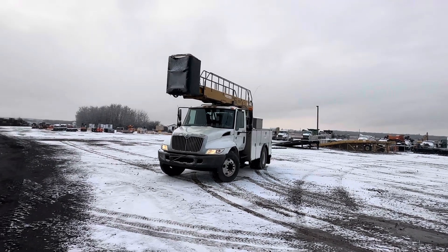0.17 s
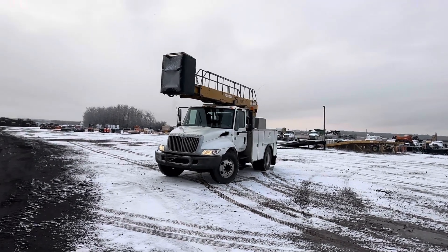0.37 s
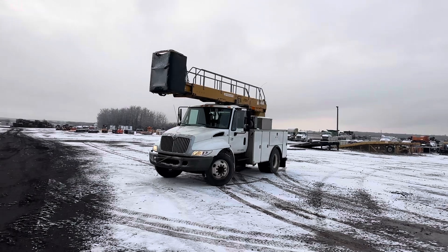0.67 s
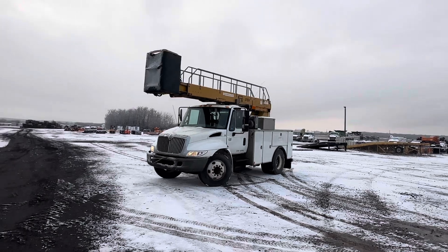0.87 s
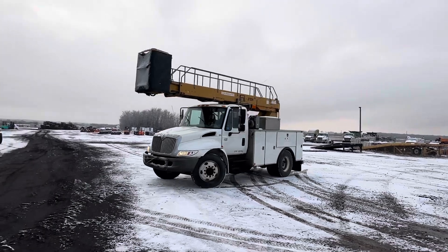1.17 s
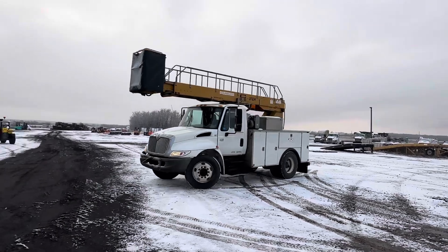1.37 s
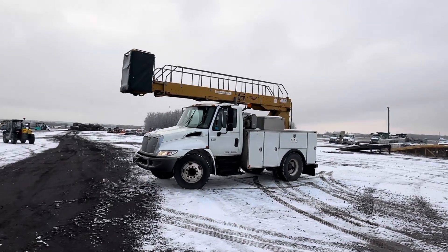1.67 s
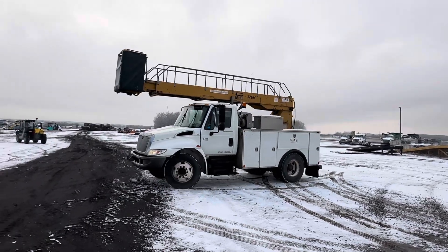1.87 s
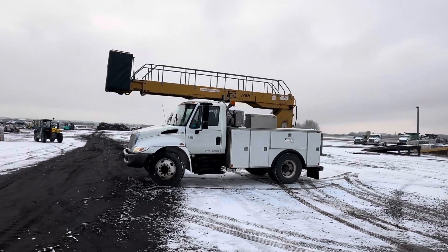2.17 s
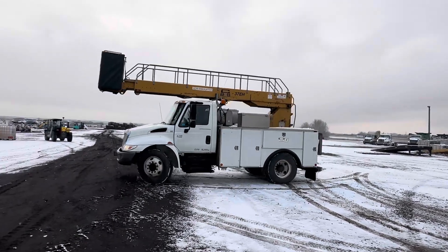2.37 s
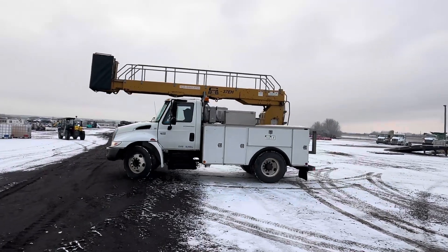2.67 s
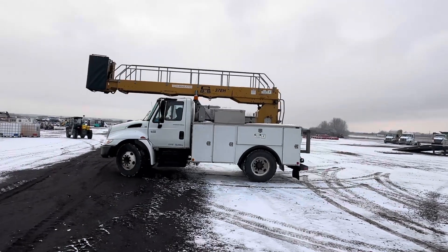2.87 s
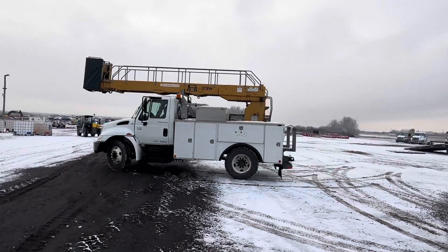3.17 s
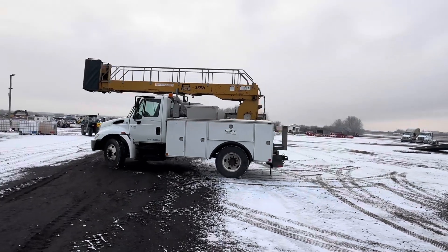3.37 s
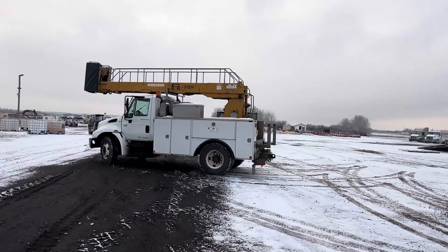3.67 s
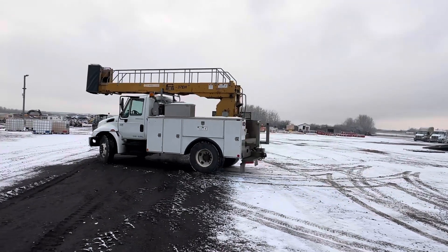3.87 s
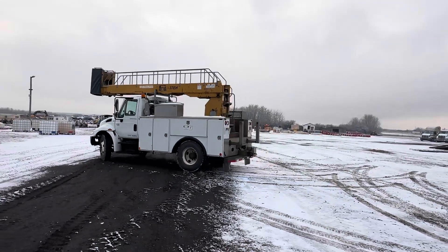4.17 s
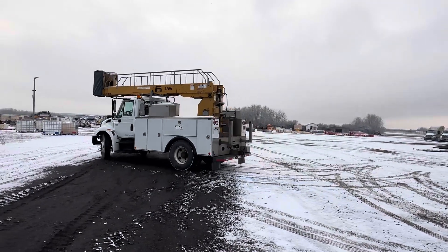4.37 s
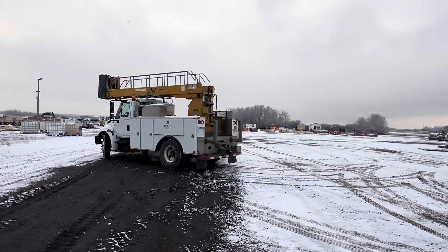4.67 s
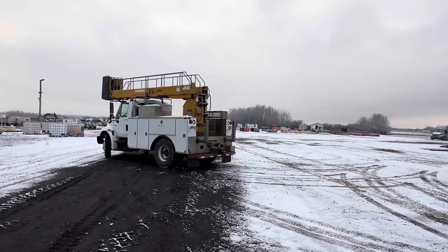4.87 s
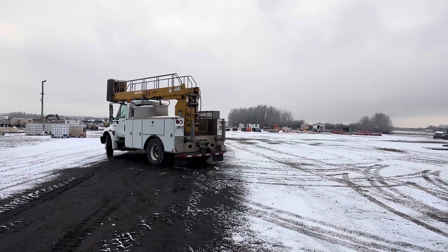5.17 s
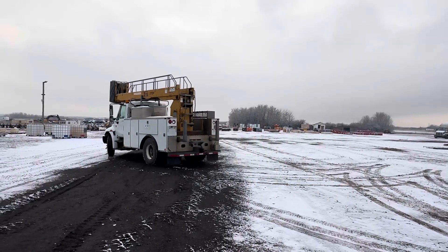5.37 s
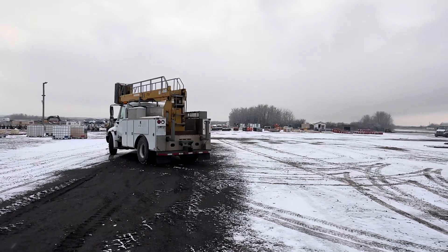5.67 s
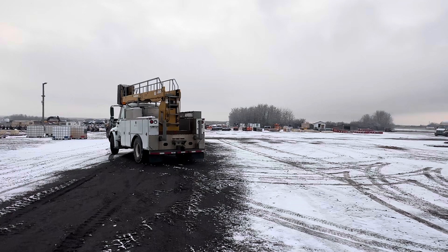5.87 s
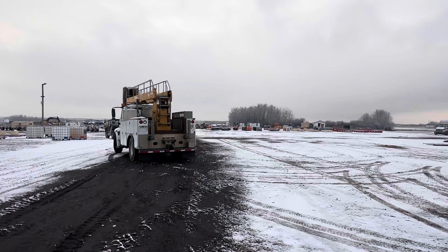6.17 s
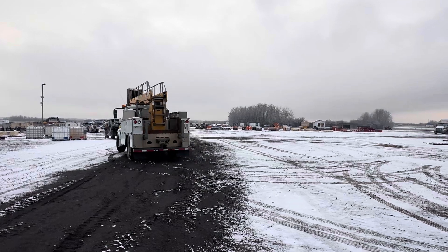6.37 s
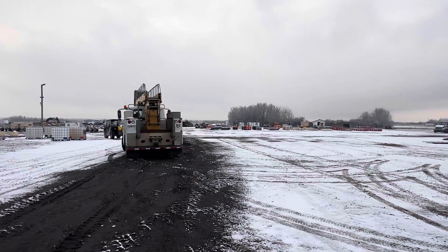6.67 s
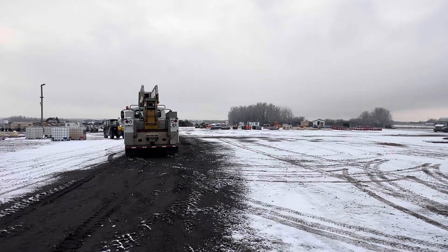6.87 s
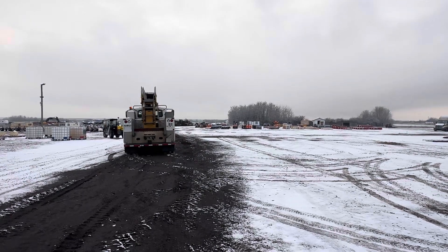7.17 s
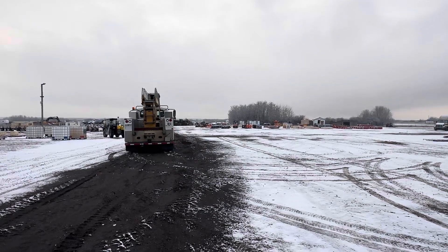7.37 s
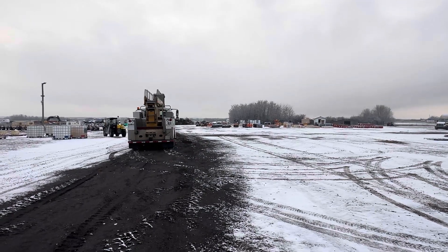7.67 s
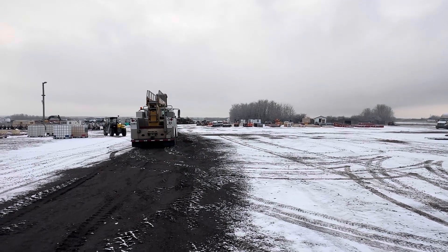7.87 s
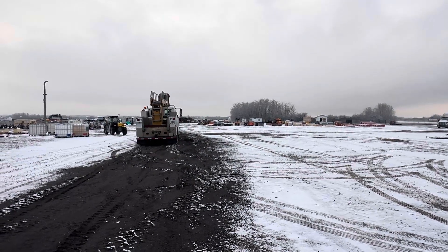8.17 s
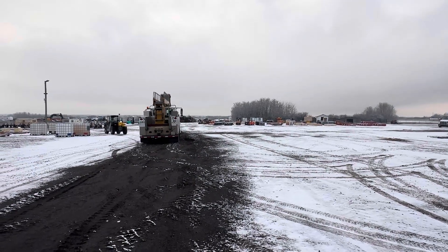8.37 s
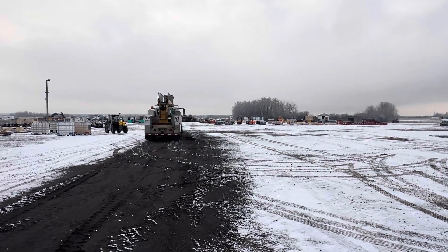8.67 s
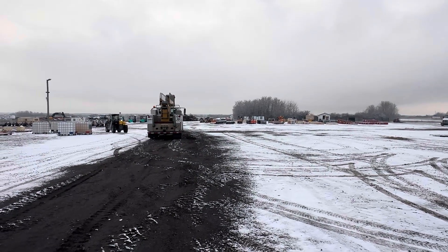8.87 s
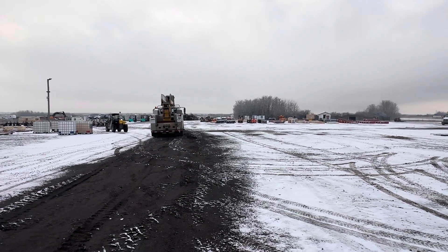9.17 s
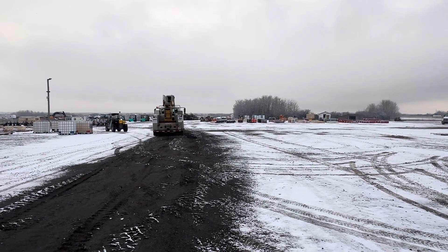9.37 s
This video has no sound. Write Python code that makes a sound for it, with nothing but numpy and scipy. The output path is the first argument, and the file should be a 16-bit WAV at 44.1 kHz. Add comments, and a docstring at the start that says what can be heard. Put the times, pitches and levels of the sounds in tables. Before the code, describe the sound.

In an open snowy gravel yard, a diesel bucket truck swings past a fixed stereo microphone pair. Its engine booms, knocks and clatters as it revs up, the drive belt chirping and the turbo whistling faintly. Revs drop, the body thumps over ruts, and a sudden slap and air hiss fades out. The engine drops again and lugs away, quieter, with loose fittings clanking.

```python
"""A diesel engine pulls and its belt chirps as a bucket truck swings past on a snowy gravel yard.
The six cylinders boom, knock and clatter; the turbo whistles, and the engine drops back twice and lugs away.
Tyres swish and flick stones, the body booms over ruts and fittings clank, made of noise bursts and ringing modes.
The air system blows off once: a slap and thud, then coloured noise that fades through a ringing outlet."""
import sys
import numpy as np
from scipy import signal
from scipy.fft import rfft, irfft, next_fast_len
from scipy.io import wavfile

SR = 44100
rng = np.random.default_rng(int(sys.argv[2]) if len(sys.argv) > 2 else 0)


def store_pcm(level_fs):
    """Save levels as 16-bit WAV."""
    pcm = np.round(np.clip(level_fs, -1, 1) * 32767).astype(np.int16)
    wavfile.write(sys.argv[1], SR, np.atleast_2d(pcm).T)


N = 419816
T = np.arange(N) / SR
HZ = np.maximum(np.fft.rfftfreq(next_fast_len(N + 4000, True), 1 / SR), 1)

NEAR_M = 10  # distance at which the engine levels are stated
# the truck swings past and leaves: (time [s], distance [m])
DISTANCE = [(0, 12.4), (2.6, 9.64), (4, 11.3), (6, 17.3), (9.5, 24.44)]
# a fixed dip thins the low middle of the jolts, slap and thud: (frequency [Hz], level [dB])
LOW_MID_DIP = [(450, -1.5), (600, -5.5), (760, -0.5)]


def from_db(db):
    """Decibels to gain."""
    return 10 ** (np.asarray(db) / 20)


def rms_one(x):
    """Scale to unit power."""
    return x / np.sqrt(np.mean(x ** 2) + 1e-20)


def in_time(rows):
    """Each column of a curve at every sample."""
    s, *columns = np.transpose(rows)
    return [np.interp(T, s, c) for c in columns]


def colour(x, points):
    """Filter by a table of (frequency [Hz], level [dB])."""
    hz, db = np.transpose(points)
    size = 2 * (len(HZ) - 1)
    gain = from_db(np.interp(np.log(HZ), np.log(hz), db))
    return irfft(rfft(x, size) * gain, size)[..., :N]


def noise():
    """Two unrelated white noises: the direct sound and the sound scattered by the yard."""
    return rng.standard_normal((2, N))


def drift(rate_hz):
    """Slow random wander with a spread of about 1, drawn at every 40th sample."""
    r = np.exp(-80 * np.pi * rate_hz / SR)
    # the first 2000 points are run-in
    slow = signal.lfilter([1], [1, -2 * r, r * r], rng.standard_normal(N // 40 + 2002))[2000:]
    return np.interp(np.arange(N) / 40, np.arange(len(slow)), rms_one(slow))


def tone(turns):
    """A sine of unit power."""
    return np.sqrt(2) * np.sin(2 * np.pi * turns)


def narrow_band(hz, width_hz):
    """Noise of about unit power around a moving pitch: two drifts on a cosine and a sine."""
    phase = 2 * np.pi * np.cumsum(hz) / SR
    cos, sin = np.cos(phase), np.sin(phase)
    return np.array([drift(width_hz) * cos + drift(width_hz) * sin for _ in range(2)])


def wavering(rows, width_hz):
    """A narrow band of turbulent sound on a curve of (time [s], pitch [Hz], level [dB])."""
    hz, db = in_time(rows)
    return from_db(db) * narrow_band(hz, width_hz)


def turning(x, views):
    """The colour of a source glides through (time [s], spectrum) as the truck turns away."""
    times = [s for s, _ in views]
    out = 0
    for share, (_, spectrum) in zip(np.eye(len(views)), views):
        out = out + np.interp(T, times, share) * rms_one(colour(x, spectrum))
    return out


def yard():
    """Machinery idles some way off, its hum wavering a little."""
    # steady hums: (frequency [Hz], level [dB], width [Hz])
    yard_hums = [(71.5, -41, 2.4), (230.9, -46.5, 7.4)]
    return sum(from_db(db) * narrow_band(np.full(N, hz), width) for hz, db, width in yard_hums)


def exhaust(firings, rate, boom_db):
    """The pipe booms at the firing rate; its overtones swell as they pass through its resonances."""
    # resonances of the exhaust pipe: (frequency [Hz], width [Hz], level [dB])
    pipe_resonances = [(71.6, 59, -41.5), (125.5, 7, -33), (168, 20, -43), (257, 45, -43.5)]
    # overtones of the firing rate: (multiple, relative level [dB])
    overtones = [(2, 2.5), (3, -9), (4, -9), (5, -6), (6, -4)]

    def pipe(hz):
        """Gain of the pipe at a moving pitch."""
        return sum(from_db(db) / (1 + (2 * (hz - centre) / width) ** 2)
                   for centre, width, db in pipe_resonances)

    sound = from_db(boom_db + 0.9 + 0.92 * drift(13)) * tone(firings)
    for k, db in overtones:
        level = pipe(k * rate) * from_db(db + 1.8 * drift(5.9))
        sound = sound + level * tone(k * firings + 0.05 * drift(4.8))
    return sound


def cycle_noise(firings, repeat, size=2048):
    """Noise of which a share comes back with every engine cycle of six firings."""
    pattern = rng.standard_normal((2, size))
    place = firings / 6 % 1 * size
    locked = np.array([np.interp(place, np.arange(size), p) for p in pattern])
    # the pattern is narrower in band than white noise, so it is scaled to the same density
    locked *= np.sqrt(np.gradient(place).clip(0, None).mean())
    repeat = np.clip(repeat, 0, 1)
    return np.sqrt(repeat) * locked + np.sqrt(1 - repeat) * noise()


def blows(firings, depth, decay, uneven_db):
    """A sharp swell at each firing; the six cylinders differ, and so does every stroke."""
    stroke = firings.astype(int)
    cylinder = np.array([1, -1, .5, 0, -1, .5])[stroke % 6]
    strength = from_db(uneven_db * (cylinder + rng.standard_normal(4000)[stroke]) / 2)
    # decay is a share of the time between firings
    return 1 + depth * strength * np.exp(-(firings % 1) / decay)


def block(firings, rate):
    """Each firing shakes the block: low rumble, diesel knock and injector clatter rise with the load."""
    # how hard the engine works: (time [s], level relative to full pull [dB])
    load = [(0.0, 0.8), (0.8, 0), (1.8, 0.5), (2.1, 1.5), (2.5, -1.4), (2.8, -6), (3.8, -7.5), (4.4, -4.5),
            (5.15, -6), (5.65, -6), (5.83, -0.2), (6.15, -2.5), (6.45, -8.5), (6.8, -10), (7.0, -8.5),
            (7.25, -9.5), (7.9, -6), (9.52, -4)]
    # rumble nearby, from the side where the service body booms, from behind towards the tailpipe,
    # and as the engine speeds up again at the end: (frequency [Hz], relative level per Hz [dB])
    rumble_near, rumble_side = [(35, -23), (60, -9), (95, 2), (135, 2.5), (165, -2.5), (240, -0.3),
                                (330, -4.5), (430, -6.5), (520, -14.5), (620, -21), (900, -48), (3000, -93)], [(35, -37), (60, 7.5), (100, 3), (160, 0), (230, 2),
                                                (330, 0), (420, 0), (510, -11), (620, -24), (900, -38),
                                                (3000, -68)]
    rumble_rear, rumble_late = [(35, -36), (60, 8), (90, 6), (120, 5.5), (165, -0.5), (250, 0.5),
                                (330, -1.5), (430, -7), (520, -9.5), (620, -27), (900, -57), (3000, -93)], [(35, -34), (60, -18), (90, 6), (130, 1), (180, 1),
                                                     (260, 1), (370, -4.5), (450, -8), (520, -14),
                                                     (620, -31), (900, -45), (3000, -71)]
    # colours of knock and clatter: (frequency [Hz], relative level per Hz [dB])
    knock_colour, clatter_colour = [(450, -35.5), (620, -12.5), (730, -1), (900, -0.5), (1130, 2.5),
                                    (1280, -2.5), (1450, -15.5), (1900, -15.5), (3000, -49), (8000, -94)], [(1100, -13), (1500, -2), (1850, 1.5), (2200, 6.5),
                                                   (2550, -2.5), (3050, -5), (3600, -23), (5000, -64),
                                                   (10000, -77.5)]

    load_db, = in_time(load)
    metres, = in_time(DISTANCE)
    far_db = -20 * np.log10(metres / NEAR_M)
    # base levels hold at full pull and the near distance;
    # rumble also changes by 1 dB per octave of firing rate, relative to 60 firings/s
    rumble_db = -26 + far_db + 0.41 * load_db + np.log2(rate / 60)
    knock_db = -29.5 + far_db + load_db
    clatter_db = -39.5 + far_db + 0.84 * load_db

    shaking = cycle_noise(firings, repeat=.3) * blows(firings, depth=.4, decay=.3, uneven_db=4)
    combustion = cycle_noise(firings, repeat=.45) * blows(firings, depth=.5, decay=.2, uneven_db=4)
    injection = noise() * blows(firings, depth=.45, decay=.15, uneven_db=4)

    rumble = turning(shaking, [(2.6, rumble_near), (4.2, rumble_side), (6.4, rumble_rear),
                               (7.6, rumble_rear), (8.8, rumble_late)])
    knock = rms_one(colour(combustion, knock_colour))
    clatter = rms_one(colour(injection, clatter_colour))
    return (from_db(rumble_db + 0.36 * drift(20)) * rumble
            + from_db(knock_db + 0.87 * drift(11)) * knock
            + from_db(clatter_db + 1.36 * drift(19)) * clatter)


def fan():
    """A nearly clean hum, probably the cooling fan, lags behind the engine speed."""
    # (time [s], pitch [Hz], relative level [dB])
    fan_curve = [(0, 132, -33), (.7, 126, -48), (1.15, 130.8, -33.5), (1.8, 136.8, -34), (2.5, 143, -29.5),
                 (3.05, 137.7, -43), (3.7, 121.2, -52), (4.4, 117, -56), (6, 115.3, -66)]
    hz, db = in_time(fan_curve)
    return from_db(db - 1 + 2 * drift(5)) * tone(np.cumsum(hz) / SR + .08 * drift(4))


def accessory(rate):
    """Belt-driven parts give rough hums geared to the engine, fading with distance."""
    # (multiple of the firing rate, relative level [dB])
    geared_hums = [(3.68, -44.5), (6.57, -44), (7.32, -43)]
    # the engine bay lets out only the low part: (frequency [Hz], level [dB])
    bay_colour = [(250, -7), (330, -1.5), (450, -1), (490, -7), (560, -30)]
    metres, = in_time(DISTANCE)
    hums = sum(from_db(db) * narrow_band(multiple * rate, width_hz=2.8) for multiple, db in geared_hums)
    return NEAR_M / metres * colour(hums, bay_colour)


def tyres():
    """Wet grit crackles under the treads: steady noise plus sparse random grains."""
    # (time [s], relative level [dB])
    swish = [(0.0, -43), (0.75, -43), (1.5, -40), (2.45, -39), (3.65, -47.5), (6.35, -48.5), (6.75, -56),
             (7.4, -52), (7.8, -55.5), (9.52, -54)]
    # swish nearby and from further off: (frequency [Hz], relative level per Hz [dB])
    swish_near, swish_far = [(2500, 2.5), (3500, 2.5), (4400, 3), (5400, -1.5), (6300, -6), (7500, -11.5),
                             (8600, -6.5), (10000, -21.5), (15500, -27.5)], [(2500, -32), (3500, 5), (4000, 3), (4550, 11.5),
                                                 (5100, 2.5), (5600, 5.5), (6300, -7), (7600, -10),
                                                 (8600, -2.5), (10000, -13.5), (12500, -48), (15500, -22.5)]
    swish_db, = in_time(swish)
    grains = rng.random((2, N)) < 900 / SR  # 900 a second
    grit = grains * noise() * from_db(1.5 * np.minimum(rng.exponential(1, N), 2))
    tread = noise() + 0.29 * rms_one(grit)
    level = from_db(swish_db - 0.85 + 1.25 * drift(16))
    return level * turning(tread, [(2.8, swish_near), (4.4, swish_far)])


def belt():
    """Each drive-belt chirp swells out of a faint singing while its pitch slides, wobbles and flutters."""
    # (time [s], length [s], first pitch [Hz], last pitch [Hz], relative level [dB])
    squeals = [(0.06, 0.21, 2196, 2194, -36.5), (0.274, .14, 2157, 2200, -37.5),
               (0.665, 0.19, 2230, 2190, -48), (0.931, 0.1994, 2127, 2210, -35.5),
               (1.153, .12, 2180, 2175, -39), (1.315, 0.066, 2040, 2160, -38),
               (1.416, .17, 2147, 2180, -38.5), (1.938, 0.2, 2190, 2238, -39),
               (2.251, 0.41, 2075, 2040, -44.5), (2.66, .12, 2220, 2075, -39.5),
               (2.8, .17, 2190, 2083, -42.5)]
    # faint singing of the slipping belt between chirps: (time [s], relative level [dB])
    belt_slip = [(0, -47), (1.6, -45), (2.9, -55), (3.3, -79)]
    level, pitch = 0, []
    for start, length, first_hz, last_hz, db in squeals:
        arch = np.sqrt(np.sin(np.pi * np.clip((T - start) / length, 0, 1)).clip(0))
        level = level + from_db(db) * arch
        pitch += [(start, first_hz), (start + length, last_hz)]
    hz, = in_time(sorted(pitch))
    slip_db, = in_time(belt_slip)
    wobbling_hz = hz + 13.65 * drift(23.3)
    flutter = from_db(2 * drift(22) - 1.5)
    chirps = level * flutter * tone(np.cumsum(wobbling_hz) / SR)
    return chirps + from_db(slip_db - 5) * narrow_band(hz, width_hz=16)


def chatter(age, t60, gap_s, count=14):
    """A run of ticks, uneven in spacing and strength, that dies away."""
    starts = gap_s * np.append(0, np.cumsum(rng.uniform(.5, 1.5, count - 1)))
    sizes = from_db(rng.normal(0, 1, count) - 60 * starts / t60)
    since = age - starts[:, None]
    return sizes @ ((since >= 0) * np.exp(-np.abs(since) / (0.64 * gap_s)))


def knocks(rows, gap_s, ringing, count=8):
    """Each contact chatters briefly around its own pitch and may leave a few partials ringing."""
    out = np.zeros((2, N))
    for s, db, hz, t60, octaves in rows:
        at = int(s * SR)
        age = T[:min(SR // 3, N - at)]
        edges = np.clip(hz * 2 ** (octaves * np.array([-.5, .5])), 20, .45 * SR)
        band = signal.butter(2, edges, "band", fs=SR, output="sos")
        ticks = rng.standard_normal((2, len(age))) * chatter(age, t60, gap_s)
        # a narrow band is raised to keep its power
        rattle = signal.sosfilt(band, ticks) * np.sqrt(SR / 2 / np.ptp(edges))
        partial_hz = hz * 2 ** (octaves * rng.uniform(-0.59, 0.94, (count, 1)))
        partials = np.sin(2 * np.pi * partial_hz * age)
        ring = rms_one(rng.standard_normal((2, count)) @ partials) * from_db(-60 * age / t60)
        out[:, at:at + len(age)] += from_db(db - 8.5) * (rattle + ringing * ring)
    return out


def struck(rows, modes):
    """Each blow rings the modes near its own pitch, every time a little differently."""
    out = np.zeros((2, N))
    mode_hz, mode_db, mode_t60 = np.transpose(modes)[..., None]
    for s, db, hz, _, octaves in rows:
        at = int(s * SR)
        age = T[:min(SR // 2, N - at)]
        near = np.exp(-(np.log2(mode_hz / hz) / octaves) ** 2)
        decay = from_db(db + mode_db - 60 * age / mode_t60)
        rings = near * decay * np.sin(2 * np.pi * mode_hz * age)
        signs = rng.choice([-1, 1], (2, len(modes)))
        out[:, at:at + len(age)] += (signs * from_db(rng.normal(0, 1.5, (2, len(modes))))) @ rings
    return out


def rattles():
    """Loose fittings clank, tyres flick stones and the body jolts: chattering noise and ringing modes."""
    # loose fittings: (time [s], relative level [dB], pitch [Hz], t60 [s], width [octaves])
    clank_rows = [(.8975, -25, 4080, 0.058, 0.59), (.9229, -28, 4250, 0.067, 0.62),
                  (6.205, -27, 3998, 0.07, 0.29), (6.2465, -32, 4037, .09, 0.53),
                  (6.331, -48, 4400, .06, 0.74), (6.984, -36, 2980, .1, 1.1), (7.025, -39, 3994, .08, 0.81),
                  (7.961, -37.5, 4200, 0.091, 1.8), (7.976, -34, 3870, 0.11, 0.92),
                  (7.997, -40, 4200, .12, 0.94), (8.063, -38.5, 4630, 0.26, 1.2),
                  (8.9462, -39, 3652, .1, 1.3), (8.953, -30, 2700, 0.27, 1.7),
                  (8.977, -33.5, 1700, 0.23, 1.6), (9.03, -38.5, 4970, 0.43, 1.67),
                  (9.2884, -32, 3750, .08, 0.24), (9.338, -37, 4700, .08, 0.33),
                  (9.388, -35, 2930, .06, 0.64), (9.423, -44, 5300, .06, 0.319),
                  (9.443, -39, 2996, 0.089, 1.65)]
    # flicked stones: (time [s], relative level [dB], pitch [Hz], width [octaves])
    stone_rows = [(1.4563, -29, 4700, 0.74), (1.544, -29.5, 5450, 0.27), (1.6642, -26, 6264, 0.17),
                  (1.746, -30.5, 6870, 0.43), (2.3781, -24.5, 8955, 0.8), (2.401, -28, 8100, 0.99),
                  (2.437, -29.5, 8100, 0.94), (4.1841, -38, 8700, 1.6), (4.256, -42, 8800, 0.27),
                  (4.3073, -29, 8945, 0.15), (4.598, -30.5, 7800, 0.59), (5.151, -26.5, 5547, 0.38),
                  (5.278, -22, 5180, 0.083), (7.513, -41, 6800, .4), (8.0525, -38.5, 8500, 0.31),
                  (8.063, -37, 8800, 0.26)]
    # body and lockers over ruts: (time [s], relative level [dB], pitch [Hz], t60 [s], width [octaves])
    jolt_rows = [(3.275, -19, 229, 0.091, 1.8), (3.345, -11, 200, 0.1, 0.95), (3.445, -28, 380, .1, 0.76),
                 (3.815, -10, 205, 0.099, 1.1), (3.872, -18.5, 232, 0.068, 1.4),
                 (3.99, -16.5, 303, 0.13, 0.78), (4.018, -15.5, 384, 0.11, 0.46),
                 (4.335, -13.5, 267, 0.078, 1.15), (4.362, -17, 312.2, 0.12, 1.1),
                 (4.455, -17, 260, .08, 0.82), (7.43, -20.5, 830, 0.25, 1.4)]
    # modes of the steel fittings and of the service body: (frequency [Hz], relative level [dB], t60 [s])
    fitting_modes, body_modes = [(1165, 7, .3), (2028, 7, 0.14), (2860, -3, 0.15), (3700, -2, 0.18),
                                 (3970, -4.5, .15), (4590, 0, 0.11), (4740, -5, 0.15), (5310, -6, .3)], [(135, 6, .1), (193, 3, .1), (230, 2.5, 0.089),
                                                   (303, 2.5, 0.068), (365, -5, 0.073), (415, 1.5, 0.084),
                                                   (443, -3, 0.072), (772, -6, .15), (956, -7, .15)]

    clanks = from_db(-2) * knocks(clank_rows, gap_s=.008, ringing=0)
    clanks += from_db(-13) * struck(clank_rows, fitting_modes)
    stone_t60_s = 0.047
    stone_contacts = [(s, db, hz, stone_t60_s, octaves) for s, db, hz, octaves in stone_rows]
    stones = knocks(stone_contacts, gap_s=.005, ringing=0.47)
    jolts = from_db(-3.5) * knocks(jolt_rows, gap_s=.015, ringing=0)
    jolts += from_db(-12) * struck(jolt_rows, body_modes)
    return clanks + stones + colour(jolts, LOW_MID_DIP)


def turbo():
    """The turbocharger whistles: a narrow band of noise that climbs and sinks, its level unsteady."""
    # (time [s], whistle pitch [Hz], relative level [dB])
    turbo_curve = [(1.0, 5000, -66), (1.35, 5450, -53), (1.6, 5860, -55), (2.0, 6550, -55),
                   (2.45, 7460, -62), (2.65, 7310, -53), (3.0, 6940, -58.5), (3.4, 6250, -61),
                   (3.8, 5630, -71), (8.2, 6200, -73), (8.8, 6270, -63.5), (9.52, 6330, -60.5)]
    return from_db(2 * drift(9)) * wavering(turbo_curve, width_hz=200)


def drone():
    """A narrow-band drone, probably the drive line, as the truck passes and again as it leaves."""
    # (time [s], pitch [Hz], level [dB])
    drone_curve = [(1.3, 297, -63), (1.52, 304.2, -30), (1.75, 312, -54), (2.1, 313.2, -33),
                   (2.45, 291.5, -35.5), (2.9, 242.8, -34), (3.4, 227.8, -54), (7.6, 225.2, -50.5),
                   (8.25, 233.5, -41), (8.85, 243.3, -38.5), (9.2, 212.9, -45), (9.52, 198.7, -36.5)]
    return wavering(drone_curve, width_hz=7.9)


def air_pump(firings, rate):
    """An engine-driven pump throbs at a share of the firing rate and comes up at high speed."""
    # harmonics of the throb: (multiple, relative level [dB])
    pump_orders = [(1, -28.5), (2, -35.5), (3, -35)]
    # fades by 57 dB per octave below 74 firings/s
    speed_db = 57 * np.minimum(np.log2(rate / 74), 0)
    out = 0
    for k, db in pump_orders:
        turns = k * (.725 * firings + 0.04 * drift(5))
        out = out + from_db(db + speed_db + 1.5 * drift(5)) * tone(turns)
    return out


def gear_whine():
    """A faint narrow-band gear whine near top speed."""
    # (time [s], pitch [Hz], level [dB])
    whine_curve = [(1.7, 2797, -55), (2.05, 3050, -49), (2.4, 2964, -52), (2.62, 3240, -68),
                   (2.8, 3165, -49.5), (3.0, 3080, -52), (3.2, 3017, -53), (3.6, 3130, -87)]
    return wavering(whine_curve, width_hz=50)


def burst(start, t60):
    """A sudden onset that dies away."""
    return (T >= start) * from_db(-60 * np.clip((T - start) / t60, 0, 2))


def chassis(x):
    """Short echoes off the chassis and the ground give the hiss a hollow, rippled colour."""
    # (delay [ms], level [dB])
    bounces = [(4.4, -13), (7.7, -12), (12.3, -13)]
    delay_ms, db = np.transpose(bounces)
    echoes = 0
    for ms, gain in zip(delay_ms, from_db(db)):
        echoes = echoes + gain * np.pad(x, ((0, 0), (int(ms * SR / 1000), 0)))[:, :N]
    return (x + echoes) / np.sqrt(1 + np.sum(from_db(db) ** 2))


def air_purge():
    """The valve slaps open and thuds, then air sputters through the ringing outlet as its pressure falls."""
    # resonances of the air outlet:
    # (frequency [Hz], width [Hz], relative level [dB], shift as the jet slows [Hz], extra fall [dB/s])
    outlet_modes = [(2230, 240, -7, 4, 25), (2806, 163, 0.5, 0.5, -15), (3610, 100, -1, -1.5, 6),
                    (4320, 140, 4.5, 150.5, 27), (4600, 130, 5, 0, 10), (5400, 160, 2, 62, 3),
                    (5720, 98, 0.5, 0, 9), (7170, 130, -5, -3, -4), (8850, 290, 1, -200, 5),
                    (9750, 470, -1.5, 1, 1)]
    # colours of the rush, the slap and the thud: (frequency [Hz], relative level per Hz [dB])
    air_colour, slap_colour, thud_colour = [(900, -34), (1600, -8), (2200, 8.5), (2800, -2.5), (3400, 2.5),
                                            (4000, 0.5), (4550, 7.5), (5050, 0), (5550, -1), (6400, -2.5),
                                            (7600, -8), (8600, 6), (10000, -28.5), (15500, -4)], [(300, -18), (550, -10), (750, 5), (1100, 1),
                                                         (1400, -22), (2200, -13), (6000, -9)], [(50, 4), (120, 8), (200, 13),
                                                                             (260, -1), (340, 15.5),
                                                                             (450, -4), (560, -17),
                                                                             (800, -4), (1100, 5),
                                                                             (1400, -21), (3500, -38),
                                                                             (9000, -48)]
    start_s, attack_s, open_s, settle_s = 4.699, 0.0017, 0.62, 0.23

    since = np.maximum(T - start_s, 0)
    # falls 26 dB/s, and another 30 dB/s as the valve shuts
    air_db = -24.5 - 26 * since - 30 * np.maximum(since - open_s, 0)
    opening = np.minimum(since / attack_s, 1)

    # the outlet's resonances shift as the jet slows, and each fades at its own rate
    age = np.minimum(since, 1)
    slowed = 1 - np.exp(-since / settle_s)
    outlet = 0
    for hz, width, db, shift, fall in outlet_modes:
        level = from_db(db - fall * age + 1.3 * drift(16)) * np.sqrt(width)
        outlet = outlet + level * narrow_band(hz + shift * slowed, width)

    # the treble of the jet dies first
    rush = rms_one(colour(noise(), air_colour))
    lowpass = signal.butter(2, 6000, fs=SR, output="sos")
    dull = signal.sosfilt(lowpass, rms_one(colour(noise(), air_colour)))
    jet = np.sqrt(1 - age) * rush + np.sqrt(age) * dull + from_db(-34.5) * outlet
    sputter_db = .7 * drift(25) + 1.1 * drift(140)
    hiss = opening * from_db(air_db + sputter_db) * jet

    crack = from_db(-20.5) * burst(start_s, t60=0.2) * rms_one(colour(noise(), air_colour))
    slap = from_db(-18.5) * burst(start_s, t60=0.058) * rms_one(colour(noise(), slap_colour))
    thud = from_db(-16.5) * burst(start_s + 0.00095, t60=0.2) * rms_one(colour(noise(), thud_colour))
    return chassis(hiss) + crack + colour(slap + thud, LOW_MID_DIP)


def microphones(sound, diffuse, lag_ms):
    """A microphone pair: the bass is nearly alike in both; a lag and scattered sound set them apart."""
    # (frequency [Hz], side minus mid [dB])
    stereo_width = [(60, -19.5), (450, -15), (660, -3), (1100, -7), (1500, 7), (2200, -9.5), (3050, 5.5),
                    (3800, 4), (4600, -5.5), (5400, 1.5), (6600, 2.5), (8600, -5.5), (10000, 6.5),
                    (14000, -5)]
    # (frequency [Hz], left minus right [dB])
    stereo_lean = [(50, -0.5), (200, 2.5), (480, 1.5), (750, 9.5), (1200, 5.5), (1700, 15.5), (2600, -6.5),
                   (4000, -4.5), (6000, 6), (15000, -2.5)]
    direct, scattered = sound
    diffuse = np.clip(diffuse, 0, 1)
    # a lag between the ports puts a quarter-turned copy into the side signal, its sign alternating with pitch
    turn = 1j * np.tanh(4 * np.sin(2 * np.pi * HZ * lag_ms / 1000))
    shifted = irfft(rfft(direct, 2 * (len(HZ) - 1)) * turn)[:N]
    side = colour(np.sqrt(diffuse) * scattered + np.sqrt(1 - diffuse) * shifted, stereo_width)
    left = colour(direct, [(hz, 20 * np.log10(2 / (1 + from_db(-db)))) for hz, db in stereo_lean])
    return np.array([left + side, 2 * direct - left - side])


def scene():
    """Engine, tyres, fittings and air system of the moving truck, and the yard's hum, at the microphones."""
    # the engine pulls up, drops back twice and lugs away:
    # (time [s], firing rate [1/s], relative exhaust boom level [dB])
    engine_curve = [(0.0, 62, -31), (0.25, 59.7, -27.5), (0.8, 62.4, -29.5), (1.05, 68.8, -26),
                    (1.4, 68.4, -31), (1.85, 80, -26), (2.46, 85, -31.5), (2.7, 82, -34.5), (3.0, 69, -37),
                    (3.4, 47.3, -37), (3.6, 52, -38), (3.75, 46.2, -29.5), (4.38, 59, -29.5),
                    (4.68, 59.5, -33.5), (5.0, 62, -31), (5.39, 60, -32), (5.6, 59, -28.5),
                    (5.87, 45.7, -23), (6.08, 41, -27.5), (6.35, 38.5, -40.5), (6.6, 34, -37),
                    (6.82, 29.3, -44), (7.05, 34.8, -42), (7.8, 38.3, -33), (8.55, 47.4, -27),
                    (9.2, 51.3, -29), (9.52, 56.7, -30.5)]
    rate, boom_db = in_time(engine_curve)
    # running count of firings, slightly uneven in speed
    firings = np.cumsum(rate * (1 + 0.003155 * drift(8.64))) / SR
    engine = exhaust(firings, rate, boom_db) + block(firings, rate) + fan() + accessory(rate)
    engine = engine + air_pump(firings, rate)
    whistles = belt() + turbo() + gear_whine()
    rolling = tyres() + rattles() + drone()
    return microphones(yard() + engine + whistles + rolling + air_purge(), diffuse=0.35, lag_ms=0.46)


def record(dry):
    """The treble is coloured by a fixed table and the top is cut steeply."""
    # (frequency [Hz], level [dB])
    treble_colour = [(9800, 0), (11300, -16), (13200, 7), (15500, 5)]
    top_cut = signal.ellip(10, .2, 80, 15900, fs=SR, output="sos")  # cutoff in Hz
    return signal.sosfilt(top_cut, colour(dry, treble_colour))


dry = scene()
out = record(dry)
store_pcm(out)
```